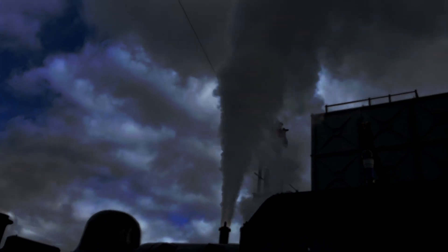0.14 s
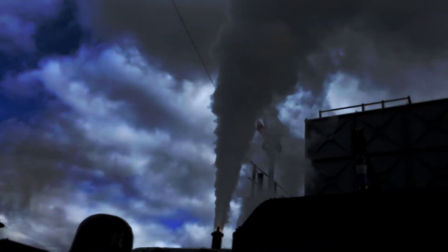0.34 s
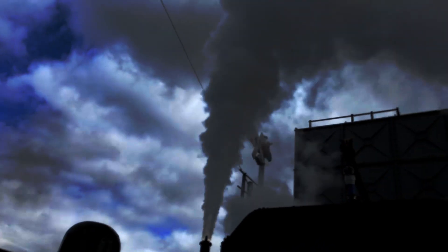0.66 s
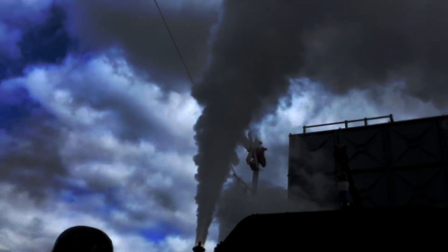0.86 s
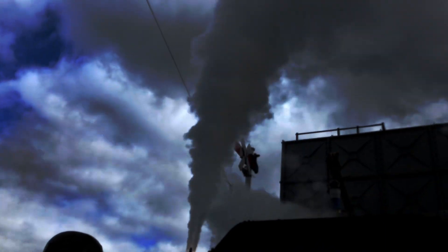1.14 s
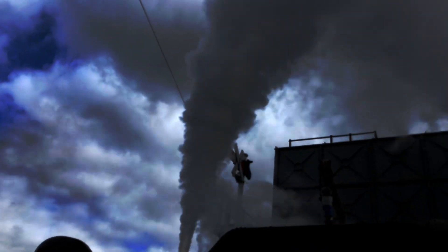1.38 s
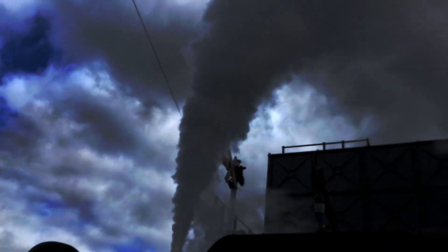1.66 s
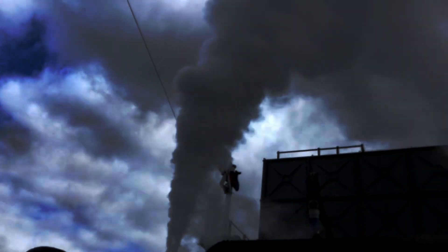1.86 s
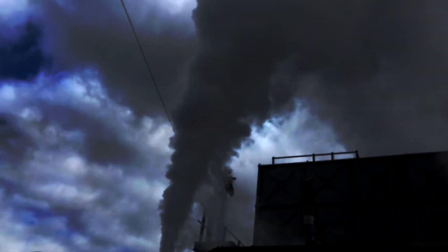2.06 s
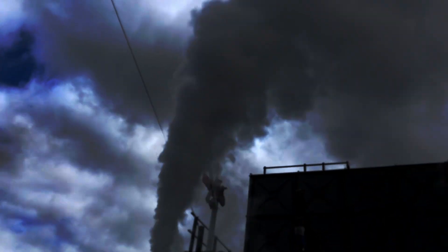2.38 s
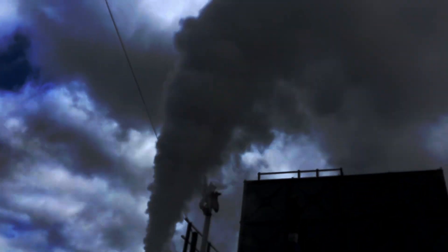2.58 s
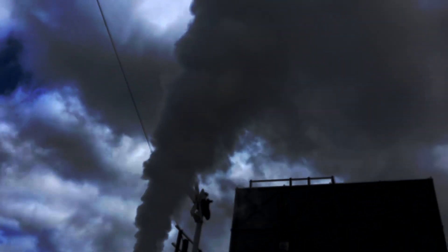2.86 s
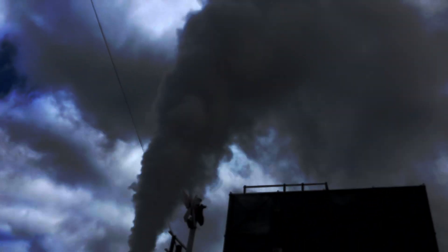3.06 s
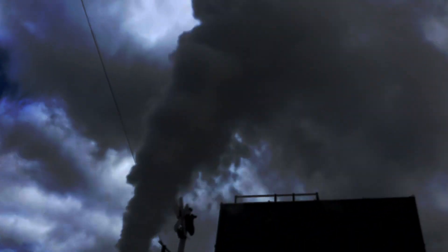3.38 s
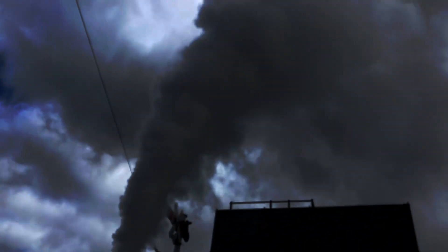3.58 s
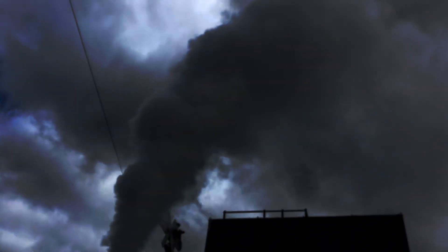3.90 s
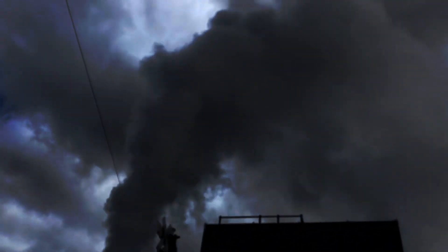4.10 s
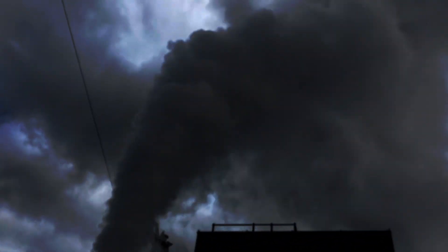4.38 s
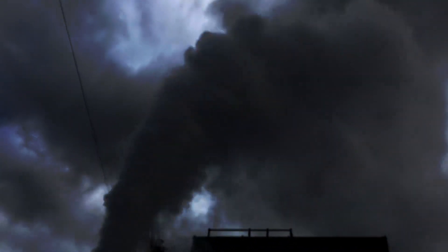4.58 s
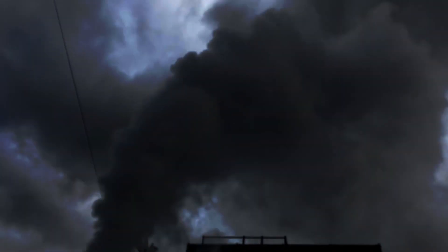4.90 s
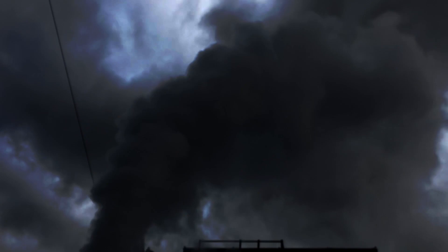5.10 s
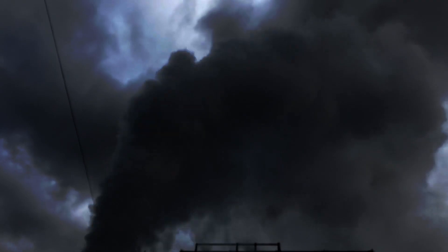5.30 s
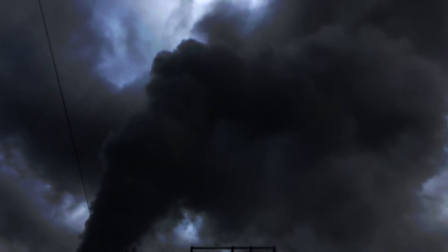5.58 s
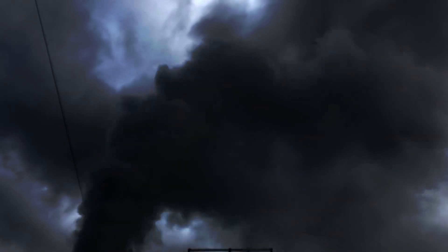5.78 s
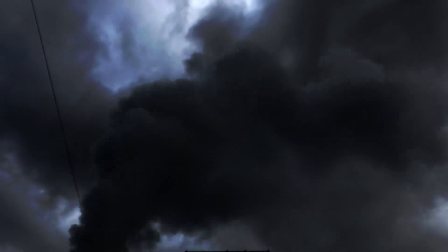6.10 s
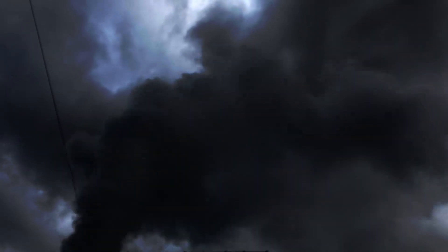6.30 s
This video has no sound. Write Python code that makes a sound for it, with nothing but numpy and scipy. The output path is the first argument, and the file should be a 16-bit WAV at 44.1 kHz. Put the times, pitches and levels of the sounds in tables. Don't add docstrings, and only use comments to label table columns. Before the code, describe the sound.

A bright, steady roar of steam blasting from a locomotive's safety valves outdoors, with gusts of wind popping and thumping on the microphone.

```python
import sys
import numpy as np
from scipy import signal
from scipy.fft import rfft, irfft, next_fast_len
from scipy.io import wavfile
from scipy.ndimage import uniform_filter1d

SR = 44100
rng = np.random.default_rng(int(sys.argv[2]) if len(sys.argv) > 2 else 0)


def unload_audio(sound):
    columns = np.transpose(np.atleast_2d(sound))
    steps = np.round(np.clip(columns, -1, 1) * 32767)
    wavfile.write(sys.argv[1], SR, steps.astype(np.int16))


def elevation(decibels):
    levels = np.asarray(decibels, float)
    return 10 ** (levels / 20)


N = 284445
FRAME = 2048


def rms_one(x):
    return x / np.sqrt(np.mean(x ** 2) + 1e-20)


def band(x, low_hz, high_hz, order=2):
    return signal.sosfilt(signal.butter(order, [low_hz, high_hz], "band", fs=SR, output="sos"), x)


def drift(rate_hz):
    hop = 40
    r = np.exp(-2 * np.pi * hop * rate_hz / SR)
    noise = rng.standard_normal(N // hop + 2002)
    slow = signal.lfilter([1], [1, -2 * r, r * r], noise)[2000:]
    return np.interp(np.arange(N) / hop, np.arange(len(slow)), rms_one(slow))


def add(out, at_s, piece):
    i = max(round(at_s * SR), 0)
    out[i:i + len(piece)] += piece[:N - i]


# t/s, snap level/dB, slide
# level/dB, thump level/dB
HARD_EDDIES = [(0.591, -15, -13, -29), (0.605, -11, 4, -39), (.635, -27, -18, -17), (0.672, -24, -17, -36),
               (.685, -17, -24, -25), (1.759, -17.5, -17, -27.5), (1.788, -20, -13, -10),
               (1.82, -19, -24, -32), (1.843, -15.5, -9.5, -16.5), (2.157, -19, -17, -20),
               (2.573, -16.5, -13.5, -15), (3.09, -20, -20, -12), (3.109, -21, -21, -21),
               (3.141, -19, -14.5, -23), (3.167, -23, -21, -14), (3.192, -25, -22, -21),
               (3.514, -15, -10, -32), (3.535, -16, -21, -15), (3.571, -19, -13.5, -30),
               (3.618, -19, -14, -30), (3.661, -15, -17, -33), (3.674, -23, -12, -19),
               (3.685, -9.5, -13, -27), (3.739, -20, -18.5, -24.5), (3.774, -16.5, -17, -16),
               (3.811, -18, -16, -19), (4.716, -19, -19, -21), (4.773, -19, -11, -14),
               (5.071, -20, -16.5, -31), (5.399, -20, -17, -35)]
# t/s, slide level/dB, thump level/dB
SOFT_EDDIES = [(.311, -26.5, -36), (.482, -23.5, -31), (.503, -21, -23), (.542, -29, -42), (.566, -22, -37),
               (.821, -22, -30), (1.214, -34, -37), (1.695, -30, -37), (2.135, -24, -44), (2.186, -27, -40),
               (2.409, -28, -47), (2.476, -26, -31), (2.527, -22, -42), (2.557, -17, -38),
               (2.615, -25, -25), (2.64, -26, -41), (2.763, -26.5, -26), (2.84, -22.5, -31),
               (3.329, -35, -36), (3.596, -31, -27), (3.644, -15, -35), (4.03, -30, -33), (4.118, -28, -34),
               (4.738, -28, -19), (4.865, -23, -22), (4.886, -32, -31), (4.928, -31, -37),
               (5.009, -21, -37), (5.432, -35, -42), (6.154, -29, -33)]
# start t/s, length t/s, slide level/dB
GUSTS = [
    (.488, .04, -30),
    (.572, .02, -17),
    (.614, .075, -21.5),
    (1.765, .09, -24.5),
    (2.537, .03, -28),
    (3.073, .13, -22.5),
    (3.513, .02, -17),
    (3.564, .115, -20),
    (3.752, .05, -29),
    (4.79, .025, -30),
]
SOFT_SNAP_DB = -5
TRAIL_S, TRAIL_SPREAD_S, TRAIL_DB, TRAIL_SPREAD_DB = .011, 0.00744, -12, 9.5
GUST_GAP_S, GUST_SPREAD_DB = .011, 3.5
TEAR_DB, TEAR_SHORTENS_PER_DB = -16.5, 0.24


def shed():
    rows = [row[:3] for row in HARD_EDDIES]
    small = [(s, slide_db) for s, slide_db, _ in SOFT_EDDIES]
    for (s, snap_db, slide_db, _), (late, weak) in zip(HARD_EDDIES, rng.random((len(HARD_EDDIES), 2))):
        if snap_db < TEAR_DB:
            small.append((s + TRAIL_S + TRAIL_SPREAD_S * late, slide_db + TRAIL_DB - TRAIL_SPREAD_DB * weak))
    for (s, length_s, slide_db), draws in zip(GUSTS, rng.random((len(GUSTS), 16, 2))):
        for k, (late, weak) in enumerate(draws):
            if GUST_GAP_S * k < length_s:
                small.append((s + GUST_GAP_S * (k + late), slide_db - GUST_SPREAD_DB * weak))
    return rows + [(s, slide_db + SOFT_SNAP_DB, slide_db) for s, slide_db in small]


# t/s, level/dB
BREEZE = [(.17, -44), (.289, -41), (.738, -37), (1.38, -48), (1.6, -45), (1.652, -38), (1.959, -45),
          (2.074, -32), (2.116, -37), (2.25, -39), (2.698, -35), (2.902, -39), (3.002, -37), (3.25, -43),
          (3.92, -40), (4.45, -48), (4.6, -41), (5.466, -41), (5.54, -46), (5.952, -43)]
BREEZE_HZ = 125
THUMP_LAG_S, THUMP_HZ, THUMP_WIDTH_S, THUMP_SPREAD = 0.01326, 106.7, 0.01302, 0.09


def thumps(boost_db, sag, rise):
    out = np.zeros(N)
    rows = [(row[0] + THUMP_LAG_S, row[-1], THUMP_HZ) for row in HARD_EDDIES + SOFT_EDDIES]
    rows += [(s, db, BREEZE_HZ) for s, db in BREEZE]
    for (s, db, hz), (turn, pitch, wide) in zip(rows, rng.random((len(rows), 3))):
        width_s = THUMP_WIDTH_S * (1 + wide ** 2)
        t = np.arange(-round(width_s * SR), round(2 * width_s * SR)) / SR
        bend = THUMP_SPREAD * (2 * pitch - 1) - sag * t / width_s
        cycles = np.cumsum(0.81 * hz * np.exp(bend)) / SR
        swell = np.exp(-2.3 * (t / width_s / np.where(t < 0, rise, 1.15)) ** 2)
        add(out, s + t[0], elevation(db + boost_db) * swell * np.sin(2 * np.pi * (cycles + turn)))
    return out


def eddies(start_hz, slide_s, snap_s, peak_s, die_s, rough_db, follower_db):
    t = np.arange(round(.05 * SR)) / SR
    chirps, snaps, swells = np.zeros(N), np.zeros(N), np.zeros(N)
    rows = shed()
    for (s, snap_db, slide_db), (pace, turn, *followers) in zip(rows, rng.random((len(rows), 4))):
        length = 1 - TEAR_SHORTENS_PER_DB * max(snap_db - TEAR_DB, 0)
        cycles = np.cumsum(start_hz / (1 + t / (slide_s * (0.727 + 0.35 * pace)))) / SR
        snap = elevation(snap_db) * t / snap_s * np.exp(1 - t / snap_s)
        decay = np.exp(-t / (die_s * np.clip(length, .2, 3)))
        swell = elevation(slide_db) * (1 - np.exp(-(t / peak_s) ** 2)) * decay
        add(chirps, s, np.hypot(snap, swell) * np.sin(2 * np.pi * (cycles + turn)))
        for rank, chance in enumerate(followers, 1):
            short = elevation(follower_db * rank) * np.hypot(snap, swell * np.exp(-t / 0.0077))
            later_s = s + length * 0.00351 * (rank + chance)
            add(chirps, later_s, short * np.sin(2 * np.pi * (cycles + 3 * chance)))
        add(snaps, s, snap)
        add(swells, s, swell)
    fine = rms_one(band(rng.standard_normal(N), 700, 3100))
    coarse = rms_one(band(rng.standard_normal(N), 162, 615))
    return elevation(2.0) * chirps + elevation(rough_db) * (snaps * fine + swells * coarse)


# t/s, hiss level/dB, sizzle level re hiss/dB
PLUME = [(0.0, -21, -5.5), (0.09, -21, -6), (0.66, -20.5, -5), (0.9, -21, -5), (1.52, -22, -6.5),
         (2.05, -20.5, -5.5), (2.8, -21.5, -6), (4.09, -21, -5.5), (4.22, -22, -5.5), (4.31, -20.5, -5.5),
         (4.49, -21.5, -5.5), (4.81, -20, -4.5), (5.19, -22, -5.5), (5.59, -21, -6), (5.75, -22.5, -6.5),
         (6.16, -21.5, -5.5), (6.36, -23.5, -7.5), (6.45, -21.5, -5.5)]
# f/Hz, level per Hz/dB
JET_COLOUR = [(30, -26), (70, -29.5), (130, -16), (250, -13), (500, -9.5), (1200, -7), (2600, -6),
              (3300, -3), (4500, -2), (6200, -1.5), (8600, -1.15), (11800, -2.5), (13000, -5.5),
              (15700, -5.5)]
# t/s, level/dB
AIRFLOW = [(0.0, -48), (0.5, -53), (0.66, -48), (0.88, -54), (3.02, -50.5), (3.5, -58), (3.7, -36),
           (3.83, -55), (4.15, -58), (4.97, -49), (5.05, -54), (5.73, -57), (5.93, -48), (6.45, -51)]
RUMBLE_HZ, CALM_HZ, BODY_HZ, HISS_HZ, SIZZLE_HZ = 130, 500, 1800, 5500, 13500
SWAY_BODY_DB, SWAY_SIZZLE_DB, SIZZLE_WANDER_DB = -0.9, 1.27, 0.24
RUMBLE_FOLLOWS, RUMBLE_WANDER_DB = .9, .7
BODY_FADE_DB_PER_S = -0.34


def steam_jet(flutter_db, patchy_db):
    s = np.arange(N) / SR
    plume_s, hiss_points, sway_points = np.transpose(PLUME)
    hiss_db = np.interp(s, plume_s, hiss_points)
    sway = np.interp(s, plume_s, sway_points)
    sway = sway - sway.mean()

    size = next_fast_len(N)
    octave = np.log2(np.fft.rfftfreq(size, 1 / SR) + 1)
    hz_points, colour_db = np.transpose(JET_COLOUR)
    noise = rfft(rng.standard_normal(size)) * elevation(np.interp(octave, np.log2(hz_points), colour_db))

    body_db = SWAY_BODY_DB * sway + BODY_FADE_DB_PER_S * (s - s.mean())
    sizzle_db = SWAY_SIZZLE_DB * sway + SIZZLE_WANDER_DB * drift(4.5)
    flow_db = np.interp(s, *np.transpose(AIRFLOW))
    rumble_db = RUMBLE_FOLLOWS * (flow_db - flow_db.mean()) + RUMBLE_WANDER_DB * drift(0.95)

    billow = drift(11.0) + 1.9 * drift(40)
    near, out = drift(8), np.zeros(N)
    anchors = np.log2([RUMBLE_HZ, CALM_HZ, BODY_HZ, HISS_HZ, SIZZLE_HZ])
    for centre in np.arange(5, 14.5, 1 / 3):
        rumble, _, body, _, sizzle = [np.interp(centre, anchors, share) for share in np.eye(5)]
        tilt_db = rumble * rumble_db + body * body_db + sizzle * sizzle_db
        own = drift(5.6)
        moving_db = flutter_db * billow + patchy_db * (own + near) + rumble * own
        near = own
        slope = np.maximum(1 - 3 * np.abs(octave - centre), 0)
        out += elevation(tilt_db + moving_db) * irfft(noise * slope, size)[:N]
    return elevation(hiss_db) * out / np.std(band(out, 3000, 10000, order=4))


def shimmer(x, ripple_db):
    overlap = FRAME * 3 // 4
    spectrum = signal.stft(x, nperseg=FRAME, noverlap=overlap)[2]
    ripples = uniform_filter1d(rng.standard_normal(spectrum.shape), size=2, axis=0)
    ripples = uniform_filter1d(ripples, size=5, axis=1)
    spectrum = spectrum * elevation(ripple_db * rms_one(ripples))
    rippled = signal.istft(spectrum, nperseg=FRAME, noverlap=overlap)[1][:N]
    return rippled * np.std(x) / np.std(rippled)


def scene():
    wind = eddies(2382, slide_s=0.000582, snap_s=0.00074, peak_s=0.002, die_s=0.0087,
                  rough_db=-7, follower_db=-6.5)
    wind = wind + elevation(-7.5) * band(wind, 460, 550, order=1)
    wind = wind + thumps(boost_db=-7.5, sag=0.94, rise=0.69)
    jet = shimmer(steam_jet(flutter_db=.12, patchy_db=.2), ripple_db=1.9)
    return np.tile(jet + wind, (2, 1))


def limiter(x, limit_db, recover_db_per_s):
    over_db = np.maximum(20 * np.log10(np.abs(x) + 1e-9) - limit_db, 0)
    climb = recover_db_per_s * np.arange(N) / SR
    held_db = np.maximum.accumulate(over_db + climb) - climb
    return x * elevation(-signal.lfilter([.02], [1, -.98], held_db))


SPLIT_BAND_EDGES = np.r_[196, 216, 240, 264, 292, 320:737:32]
SPLITS_PER_S, GRID_START = 8, 766


def split_noise(mid, split_db):
    hop, n, count = FRAME // 2, np.arange(FRAME), round(SPLITS_PER_S * N / SR)
    side = np.zeros(N)
    window = np.sin(np.pi * (n + .5) / FRAME)
    for (when, where, wide), draws in zip(rng.random((count, 3)), rng.standard_normal((count, hop))):
        i = GRID_START + hop * int(when * (N - GRID_START - hop) / hop)
        first = int(where ** .9 * (len(SPLIT_BAND_EDGES) - 2))
        edges = SPLIT_BAND_EDGES[first:][:3 + (wide < .25)]
        bins = np.arange(edges[0], edges[-1])
        tones = window * np.cos(np.pi / hop * np.outer(bins + .5, n + .5 + hop / 2))
        piece = np.pad(mid[i:i + FRAME], (0, max(i + FRAME - N, 0)))
        level = elevation(split_db) * np.std(tones @ piece) * 2 / hop
        add(side, i / SR, level * (draws[bins] @ tones))
    return side


def roll_off(x):
    return signal.sosfilt(signal.butter(12, 17050, fs=SR, output="sos"), x)


def record(dry):
    mid = signal.sosfilt(signal.butter(2, 41, "high", fs=SR, output="sos"), dry[0])
    mid = limiter(mid, limit_db=-7.5, recover_db_per_s=253)
    mid = signal.sosfilt(signal.ellip(14, .3, 80, 15740, fs=SR, output="sos"), mid)
    side = split_noise(mid, split_db=-2.8)
    return roll_off(np.array([mid + side, mid - side]))


dry = scene()
out = record(dry)
unload_audio(out)
```